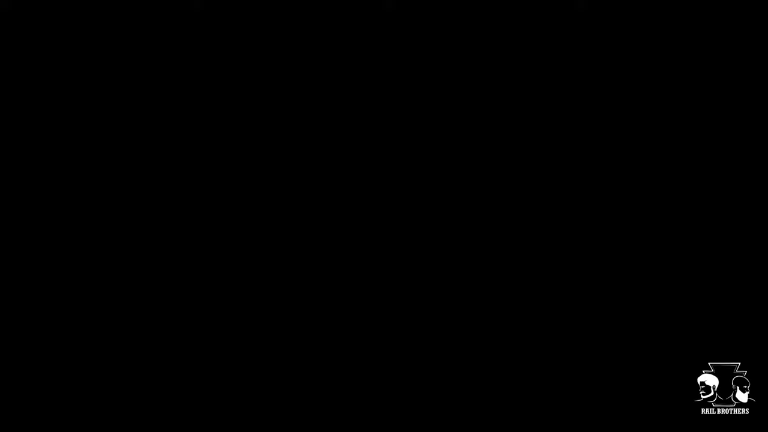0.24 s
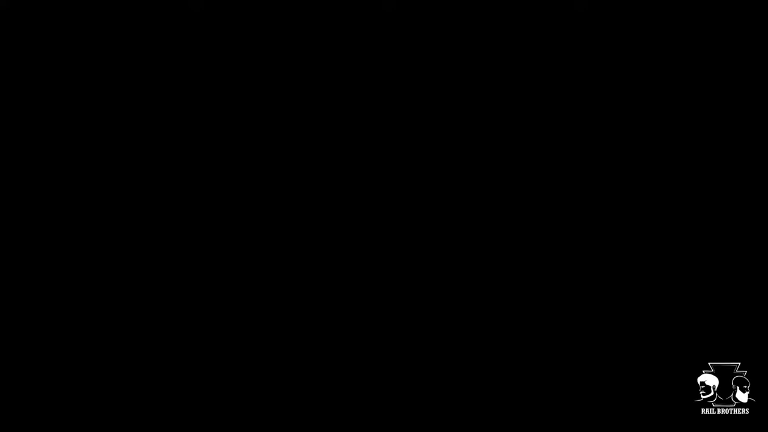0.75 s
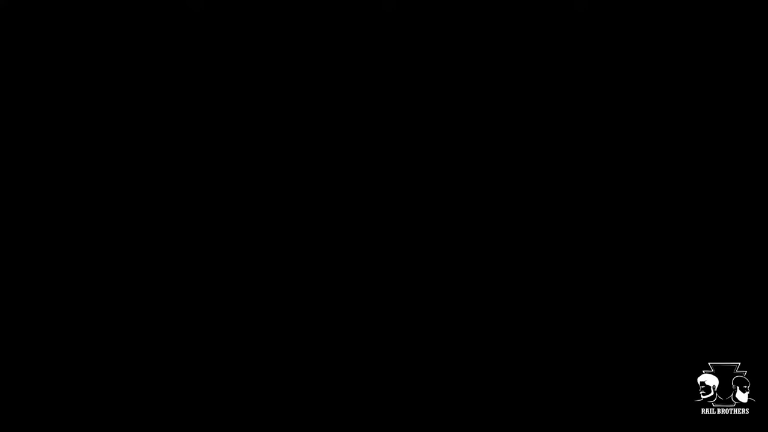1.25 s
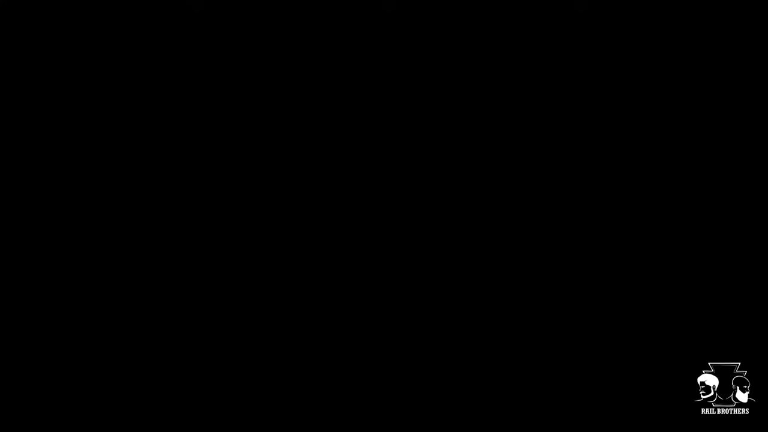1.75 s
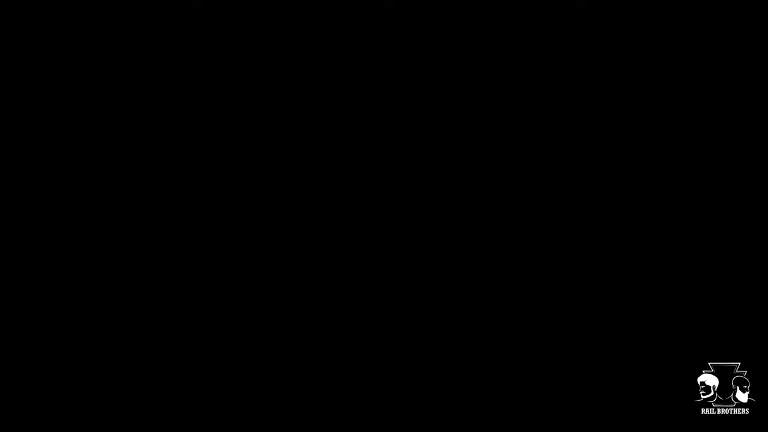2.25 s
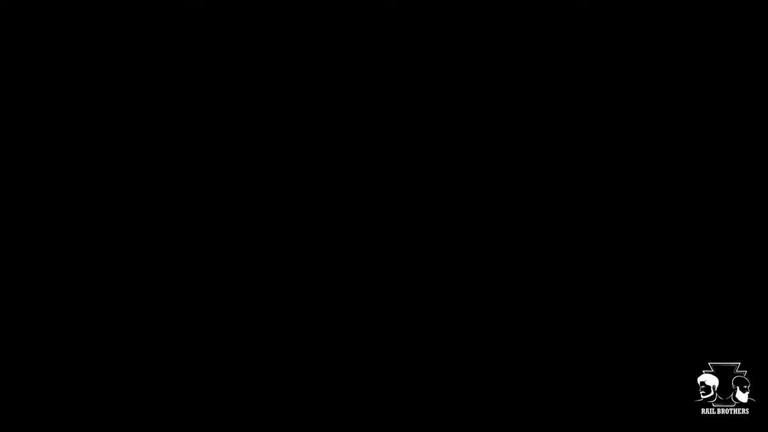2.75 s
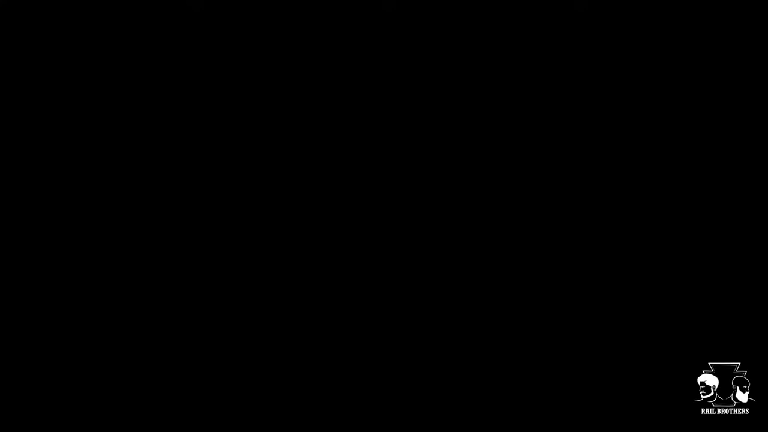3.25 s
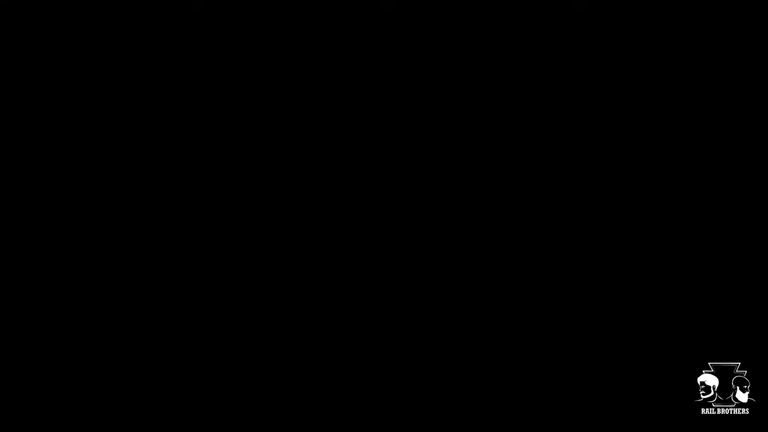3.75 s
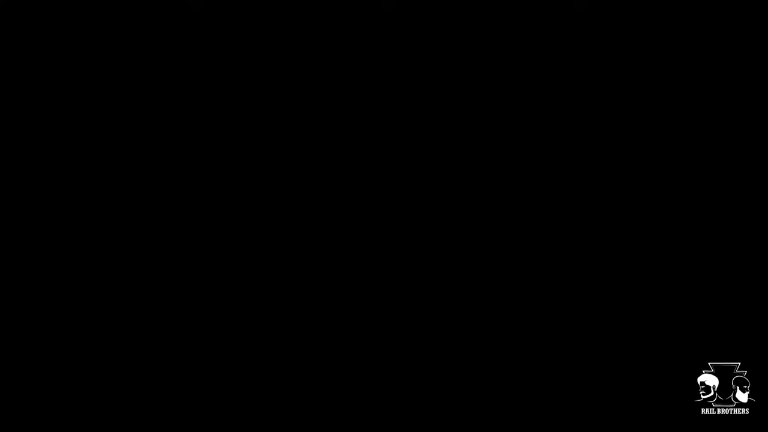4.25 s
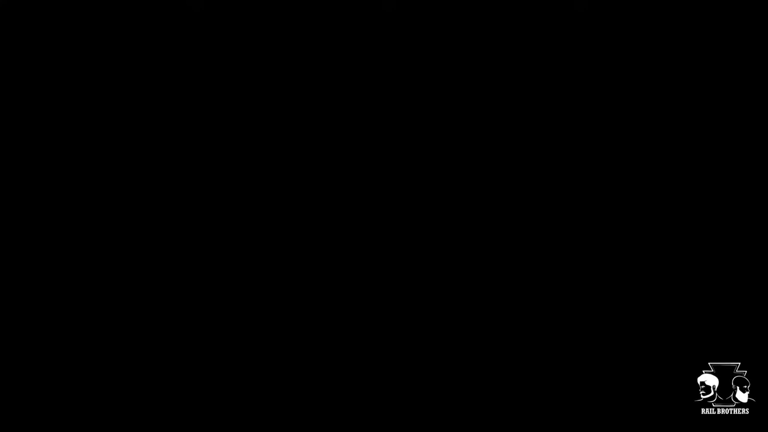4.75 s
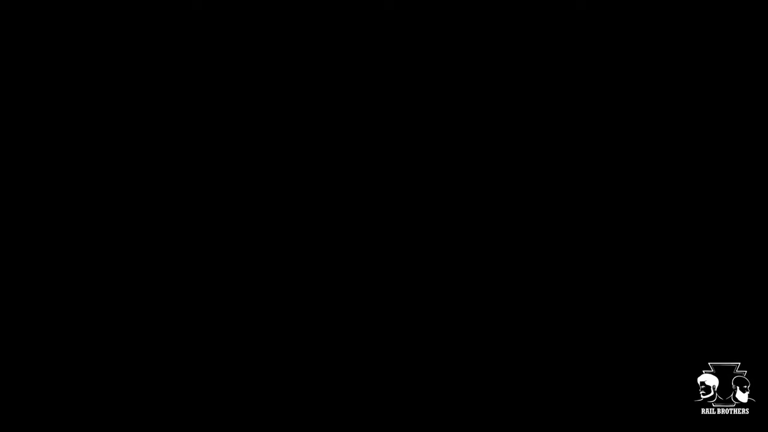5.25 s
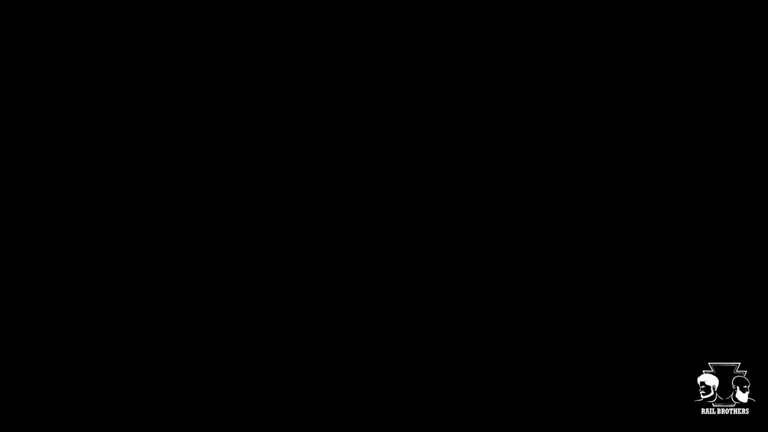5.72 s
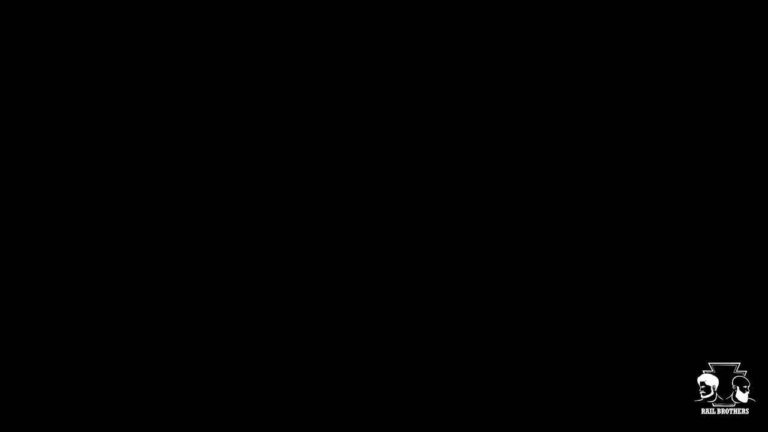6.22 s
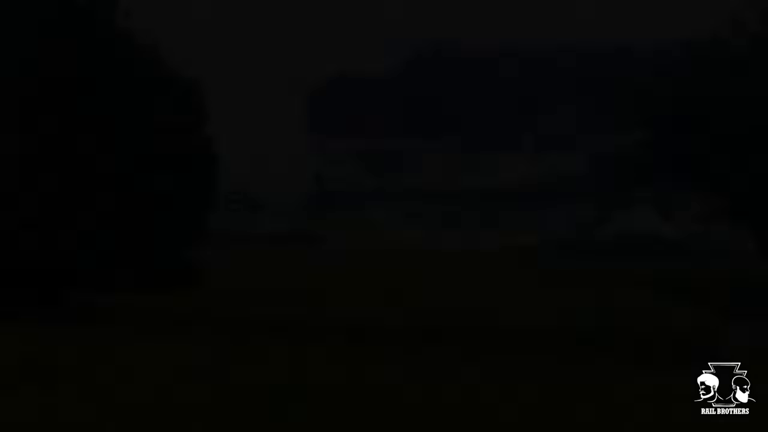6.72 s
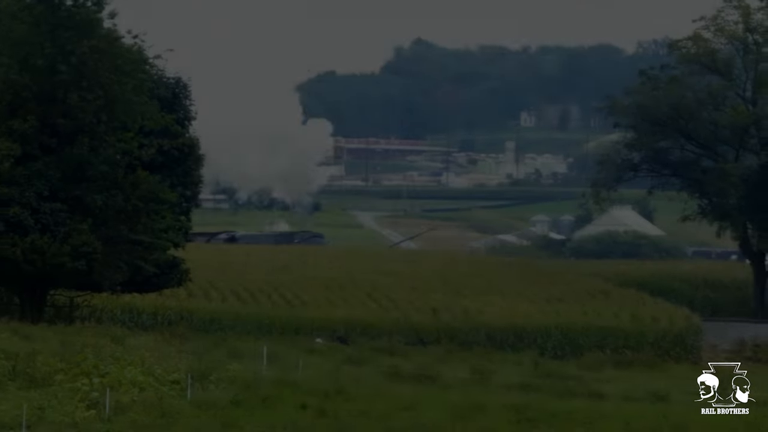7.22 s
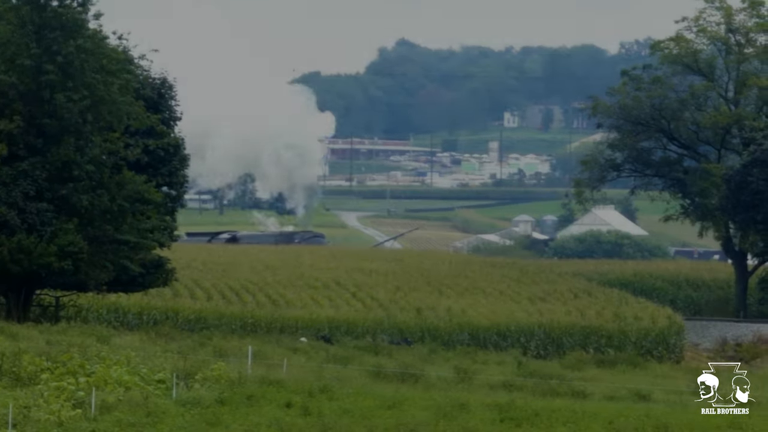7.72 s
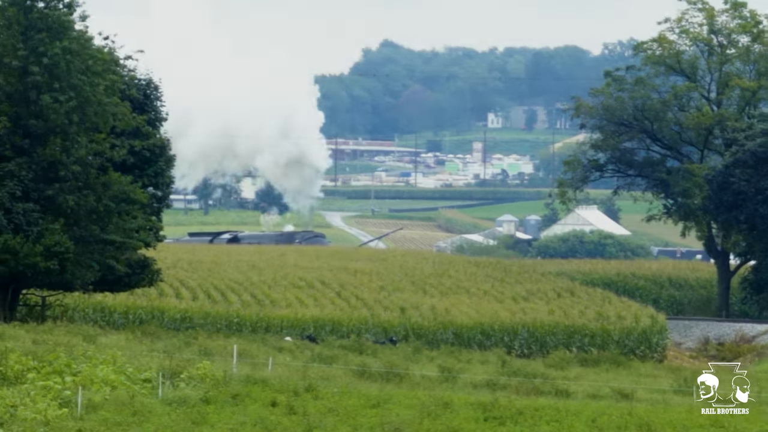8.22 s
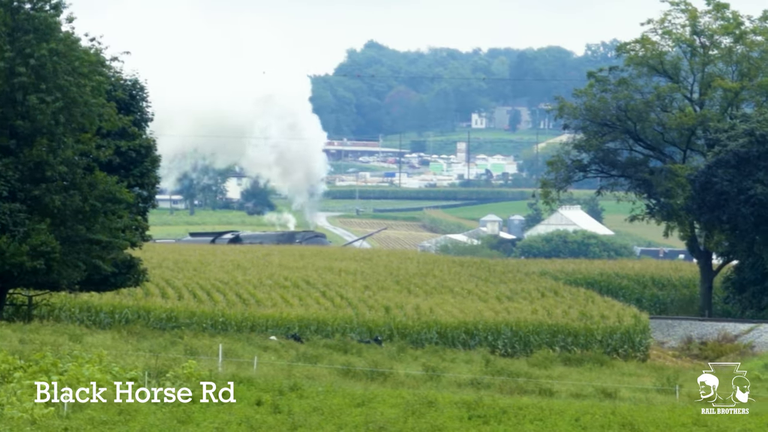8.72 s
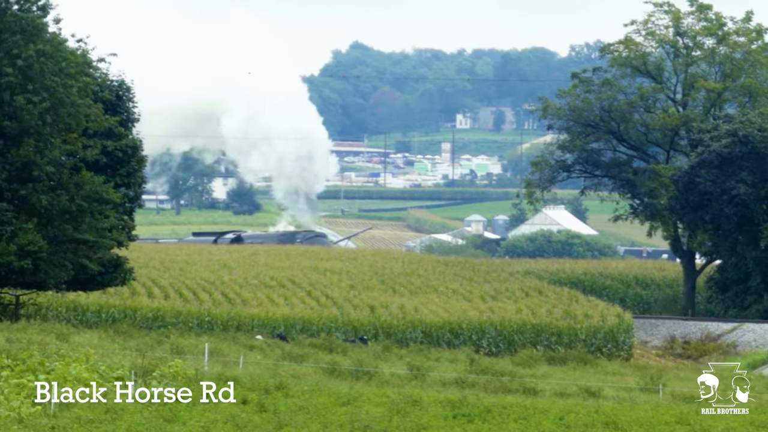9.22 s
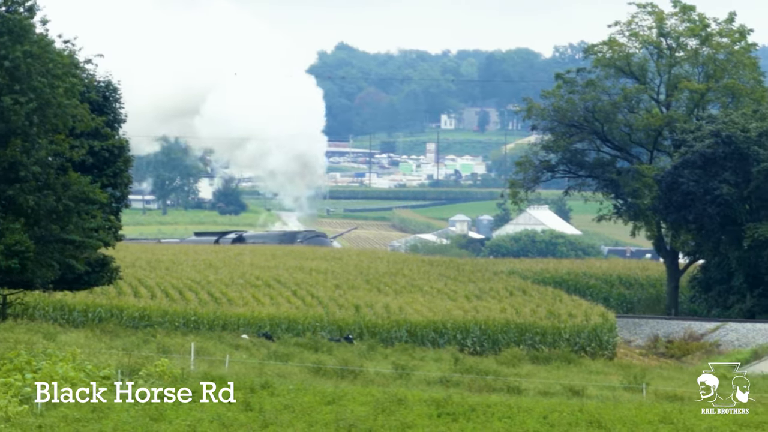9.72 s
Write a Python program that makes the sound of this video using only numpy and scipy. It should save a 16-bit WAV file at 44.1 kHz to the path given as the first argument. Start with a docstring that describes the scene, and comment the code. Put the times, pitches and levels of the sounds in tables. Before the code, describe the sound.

From near silence, a summer meadow fades in over about 2.5 seconds. Low wind gusts rumble on the microphone, most noticeably around 2.2 and 3.2 s, then ease. Shrill crickets trill continuously around 7 kHz, somewhat stronger on the right, with rough short chirps from a nearer one and a very fine high sizzle above. A faint whistle slides downward at 2.3 s. Far off, a steam locomotive works over a low, wavering drone: soft, hollow puffs about five a second, slightly uneven in fours, each followed by a dull thump. The puffs emerge after 2 s and grow clearer, strongest near 6.6 and 9 s. Heavier low booms fall at 5.9 and 8.3 s. At 6.6 s a quick grainy rustle brushes close by for about a quarter second; around 7 s a lone cricket's soft regular pips swell and sink. Train and insects continue to the end at 10 s.

```python
"""A steam locomotive works far off across summer fields, about five exhaust beats a second.
The sound fades in over some two and a half seconds, while a breeze rumbles on the microphone.
Throughout, shaped noise makes puffs, thumps and drone; gliding tones make the crickets in the grass.
A faint falling whistle comes soon after two seconds; past six, noise bursts rustle close by,
and shortly afterwards the soft pips of a lone cricket swell once."""
import sys
import numpy as np
from scipy import signal
from scipy.fft import rfft, irfft, next_fast_len
from scipy.io import wavfile

SR = 44100
rng = np.random.default_rng(int(sys.argv[2]) if len(sys.argv) > 2 else 0)


def wrap_up_sound(samples):
    """Save the sound to the file named by the first command line argument, as 16-bit audio."""
    columns = np.atleast_2d(samples).T
    # keep every value between -1 and 1, then stretch to whole-number steps
    tamed = np.clip(columns, -1, 1)
    steps = np.round(tamed * 32767).astype(np.int16)
    wavfile.write(sys.argv[1], SR, steps)


N = 439677
TIME = np.arange(N) / SR
BINS = np.fft.rfftfreq(N, 1 / SR)


def amp(db):
    """Decibel law: a level in dB becomes an amplitude ratio."""
    return 10 ** (np.asarray(db) / 20)


def unit(x):
    """Normalization: the signal is scaled to an rms of one."""
    return x / np.sqrt(np.mean(x ** 2) + 1e-20)


def level(rows):
    """Level contour: gain over time from rows of (time [s], level [dB])."""
    return amp(np.interp(TIME, *np.transpose(rows)))


def over_hz(points):
    """Spectral interpolation: (frequency [Hz], value) points are joined on a log-frequency axis."""
    hz, value = np.transpose(points)
    return np.interp(np.log(BINS + 1), np.log(hz + 1), value)


def drift(per_s, count=16384):
    """Random modulation: unit normal values, per_s of them a second, joined by straight lines."""
    return np.interp(TIME * per_s, np.arange(count), rng.standard_normal(count))


# Likeness of the two channels: (frequency [Hz], correlation [-1 to 1])
CHANNEL_CORRELATION = [(60, 0.96), (130, 0.92), (290, 0.67), (640, 0.21), (1400, 0.28), (3100, 0.03),
                       (7000, -.15), (11000, 0.12), (15000, 0.47)]


def noise(colour, left_db=0, same=None):
    """Spectral shaping: stereo noise of given colour, channel correlation and lean to the left."""
    size = next_fast_len(N)
    hz = np.fft.rfftfreq(size, 1 / SR)
    first, second = rfft(rng.standard_normal((2, size)))
    if same is None:
        same = np.interp(hz, BINS, over_hz(CHANNEL_CORRELATION))
    same = np.clip(same, -1, 1)
    other = same * first + np.sqrt(1 - same ** 2) * second
    skirt = 1 / (1 + (hz / colour[-1][0]) ** 8)  # roll-off around the last colour point
    shape = np.interp(hz, BINS, amp(over_hz(colour))) * skirt
    pair = irfft(np.array([first, other]) * shape, size)[:, :N]
    return unit(pair) * amp([[left_db / 2], [-left_db / 2]])


def band(hz, width):
    """Heterodyning: slow noise modulates a carrier into one resonance of unit rms, which may move."""
    low_pass = signal.butter(2, width / 2, fs=SR, output="sos")
    slow = signal.sosfilt(low_pass, rng.standard_normal((2, N)))
    angle = 2 * np.pi * np.cumsum(hz * np.ones(N)) / SR
    return unit(slow[0] * np.cos(angle) + slow[1] * np.sin(angle))


def swell(s, half_length):
    """Gaussian envelope: a smooth hump of height one at time s, down to 1/e at half_length."""
    return np.exp(-((TIME - s) / half_length) ** 2)


def bursts(starts, levels_db, rise, decay):
    """Energy summation: bursts that swell quickly and decay exponentially add in power."""
    power = np.zeros(N)
    t = np.arange(SR // 2) / SR
    shape = (1 - np.exp(-(t / rise) ** 2)) * np.exp(-t / decay)
    for s, db in zip(starts, levels_db):
        part = power[round(s * SR):][:len(t)]  # a view, so that += adds into power
        part += (amp(db) * shape[:len(part)] / shape.max()) ** 2
    return np.sqrt(power)


def strokes(hz, fall, per_s, duty, scrape, unsteady=.015):
    """Stridulation: a wing file dragged over its scraper gives a tone that sinks through each stroke."""
    turns = np.cumsum(per_s * (1 + unsteady * drift(1.5))) / SR + rng.random()
    along = np.minimum(turns % 1 / duty, 1)  # 0 to 1 through the stroke, then silent
    pitch = hz * (1 + fall * (.5 - along) + scrape * drift(900) + .003 * drift(8))
    return np.sqrt(np.abs(np.sin(np.pi * along))) * np.sin(2 * np.pi * np.cumsum(pitch) / SR)


def grass(x, t60, direct):
    """Multiple scattering: stalks and leaves give many short decaying paths, different for each side."""
    t = np.arange(SR // 5) / SR
    paths = rng.standard_normal((2, len(t))) * amp(-60 * t / t60)
    paths /= np.linalg.norm(paths, axis=1, keepdims=True)
    paths[:, 0] += direct * np.array([1, -1])  # direct sound, of opposite sign on the two sides
    scattered = signal.oaconvolve(x[None], paths, axes=1)[:, :N]
    return np.array([unit(side) for side in scattered])


# Drone of the rolling train and the countryside: (frequency [Hz], density [dB per Hz])
DRONE_SPECTRUM = [(20, -29), (45, -14), (62, -9.5), (84, -2.5), (100, -9.5), (135, -3.5), (165, -15),
                  (200, -14), (300, -19), (520, -21), (850, -20), (2000, -23.5), (4000, -24), (9000, -36)]
# Faint hum within the drone: (frequency [Hz], width [Hz], level [dB])
HUM_BANDS = [(63.3, 6.4, -50), (97, 4.7, -54.5), (114, 6.4, -52.5), (135, 6.6, -56.5), (359.6, 9.2, -69.5)]


def drone():
    """Superposition: the roar of wheels and distance, with the wavering hum of narrow noise bands."""
    hum = sum(amp(db) * band(hz, width) for hz, width, db in HUM_BANDS)
    roar = amp(-45.5) * noise(DRONE_SPECTRUM, left_db=0.5)
    return roar * amp(.5 * drift(2.97)) + hum


# Wind on the microphone: (frequency [Hz], density [dB per Hz])
WIND_SPECTRUM = [(10, -23), (22, -6), (35, 1.5), (60, 0), (100, -3.5), (170, -16.5), (300, -42), (800, -67)]
# The breeze dies down, then recovers slightly: (time [s], level [dB])
BREEZE_LEVEL = [(0, -39), (1.8, -44), (2.7, -47), (4.2, -48.5), (4.8, -50), (5.3, -50), (5.9, -47.5),
                (9.97, -47)]
# Its gusts: (time of the height [s], half length [s], level [dB])
GUST_HUMPS = [(.48, .035, -30), (0.825, 0.067, -31), (1.123, 0.041, -35), (1.96, .07, -36),
              (2.208, 0.028, -29), (3.184, 0.039, -28.5), (3.365, 0.22, -36.5), (3.9, 0.11, -38)]


def breeze():
    """Wind buffeting: lumpy low noise, alike on both sides, to which gusts add in power."""
    power = level(BREEZE_LEVEL) ** 2
    for s, half_length, db in GUST_HUMPS:
        power += (amp(db) * swell(s, half_length)) ** 2
    return noise(WIND_SPECTRUM, left_db=2.5, same=0.86) * np.sqrt(power) * amp(2.6 * drift(11))


def far_bird(s=2.27, half_length=.05, hz=2550, sink_hz_per_s=3800, db=-56):
    """Frequency modulation: one faint whistle slides downwards."""
    pitch = hz - sink_hz_per_s * np.clip(TIME - s, -2 * half_length, 2 * half_length)
    return amp(db) * swell(s, half_length) * np.sin(2 * np.pi * np.cumsum(pitch) / SR)


SIZZLE_DB = -52.5
# The high sizzle of katydids: (frequency [Hz], density [dB per Hz])
SIZZLE_SPECTRUM = [(6000, -48), (8800, -8.5), (10000, -4.5), (12000, -1), (14000, 2), (15700, 0),
                   (17000, -20)]
# Thin whines in it: (time of the height [s], half length [s], pitch [Hz], glide [Hz per s], level [dB])
GLIDING_WHINES = [(1.3, .4, 14200, 300, -60), (2.3, .45, 15000, 1000, -60), (5.15, .35, 15200, 1500, -62),
                  (6.2, .5, 14200, 1501.5, -57.5), (9.9, .4, 14200, -600, -54)]


def katydids():
    """Band-limited noise: a fine, even sizzle above the crickets, with gliding resonances in it."""
    out = noise(SIZZLE_SPECTRUM, left_db=1.2) * amp(SIZZLE_DB + 1.2 * drift(55))
    for s, half_length, hz, glide, db in GLIDING_WHINES:
        pitch = hz + glide * np.clip(TIME - s, -half_length, half_length)
        sides = np.array([band(pitch, 800), band(pitch, 800)])  # independent left and right
        out += sides * amp(db) * swell(s, half_length)
    return out


# Farther chirping crickets: (wing pitch [Hz], fall [share of pitch], strokes [per s], chirps [per s],
# time near one chirp [s], left level [dB], right level [dB])
FAR_CHIRPERS = [(4720, 0.049, 19.4, 2.5, 0.33, -65, -61.5), (4370, 0.05, 18, 2.6, 0.12, -59, -57.5),
                (4080, 0.17, 16.5, 2.38, 0.26, -68, -57.5)]
# They slowly grow quieter: extra level at the start [dB], loss [dB per s]
EAGER_DB, TIRE_DB_PER_S = 3, .5


def chirping_crickets():
    """Amplitude modulation: farther voices pulse, each at its own wandering pace of chirps."""
    out = np.zeros((2, N))
    for hz, fall, per_s, chirps_per_s, s, left_db, right_db in FAR_CHIRPERS:
        turns = chirps_per_s * (TIME - s) + 0.21 * drift(1.42)
        chirp = np.clip(0.2 + 0.85 * np.cos(2 * np.pi * turns), 0, 1)
        wing = strokes(hz, fall, per_s, duty=.7, scrape=.015, unsteady=.05)
        out += grass(wing * chirp, t60=0.05, direct=1.0) * amp([[left_db], [right_db]])
    return out * amp(EAGER_DB - TIRE_DB_PER_S * TIME + 1.2 * drift(0.76))


# Soft pips swell once: resting level [dB], swell [dB], its middle [s], its half length [s]
PIP_DB, PIP_SWELL_DB, PIP_SWELL_AT_S, PIP_SWELL_S = -61, 12, 7.03, 0.76


def lone_cricket():
    """Periodic pulses: regular short pips, stronger on the right, each a little arch of pitch."""
    pip_at_s, pips_per_s, top_hz = 6.803, 4.33, 5560
    from_pip = ((TIME - pip_at_s) * pips_per_s + .5) % 1 - .5  # in pip periods
    pitch = top_hz * (1 - 4 * np.minimum(from_pip ** 2, .02) + .008 * drift(900))
    wing = np.exp(-(from_pip / .06) ** 2) * np.sin(2 * np.pi * np.cumsum(pitch) / SR)
    loudness = amp(PIP_DB + PIP_SWELL_DB * swell(PIP_SWELL_AT_S, PIP_SWELL_S))
    return grass(wing, t60=0.045, direct=1.2) * loudness * amp([[-8], [0]])


# The blur of many far crickets: (frequency [Hz], density [dB per Hz])
CHORUS_SPECTRUM = [(3000, -44.5), (4100, -28), (4490, -22), (4950, -29.5), (5500, -22.5), (6000, -20.5),
                   (6400, -8.5), (6750, -4.5), (7110, 2), (7280, -6), (7420, -3), (7750, -19), (8200, -23),
                   (8900, -67)]
# Near trills: (wing pitch [Hz], strokes [per s], left and right level within the chorus [dB, dB])
NEAR_TRILLS = [(6923, 13.8, -6, .5), (7006, 16.3, 4, 0), (6770, 15.1, -4.5, -11), (6825, 12.9, -4.5, -9.5),
               (7392, 14.2, -0.5, -14.5)]
# Gain of the whole chorus: (time [s], level [dB], lean to the left [dB])
CHORUS_GAIN = [(2.5, -36.5, -4.5), (3.6, -34.5, -3.5), (4.6, -33, -2), (5.2, -36, -4), (6, -36.5, -6),
               (7.4, -37, -6.5), (8.8, -37, -9.5), (9.97, -37.5, -7)]


def trilling_crickets():
    """Incoherent summation: far trills merge into noise, from which a few near ones stand out."""
    chorus = amp(4.0) * noise(CHORUS_SPECTRUM) * amp(1.3 * np.array([drift(40), drift(40)]))
    for hz, per_s, left_db, right_db in NEAR_TRILLS:
        wing = strokes(hz, .06, per_s, duty=.58, scrape=.023, unsteady=.012)
        trill = wing * amp(1.5 * drift(15))
        chorus += grass(trill, t60=0.044, direct=0.72) * amp([[left_db], [right_db]])
    s, db, lean_db = np.transpose(CHORUS_GAIN)
    return chorus * amp([np.interp(TIME, s, db + side * lean_db / 2) for side in (1, -1)])


# Clearest chirps of the nearest cricket: (time [s], strokes, pitch [Hz], level before side gains [dB])
NEAREST_CHIRPS = [(.42, 4, 4500, -47), (1.32, 5, 4580, -49), (1.77, 5, 4560, -44), (2.13, 3, 4640, -50),
                  (2.411, 3, 4530, -47.5), (2.78, 6, 4530, -49.5), (3.55, 3, 4480, -49),
                  (4.138, 4, 4490, -47), (4.721, 4, 4480, -49.5), (5.25, 4, 4560, -48),
                  (5.849, 3, 4470, -52), (6.9, 3, 4490, -50.5), (7.52, 3, 4470, -54), (8.65, 3, 4500, -51),
                  (9.38, 4, 4510, -49), (9.889, 2, 4430, -48)]


def nearest_cricket(fall=0.051, per_s=18):
    """Stridulation: chirps of a few rough wing strokes, each sinking in pitch."""
    out = np.zeros(N)
    scrape = .013 * drift(900)
    for s, count, hz, db in NEAREST_CHIRPS:
        span = (TIME >= s) & (TIME < s + round(count) / per_s)
        along = np.minimum((TIME[span] - s) * per_s % 1 / .75, 1)
        pitch = hz * (1 + fall * (.5 - along) + scrape[span])
        out[span] += amp(db) * np.sin(np.pi * along) * np.sin(2 * np.pi * np.cumsum(pitch) / SR)
    # grass() normalizes, so the level is restored before the side gains
    return grass(out, t60=0.039, direct=0.91) * np.std(out) * amp([[1.5], [7.5]])


# The body of the rustle: (frequency [Hz], density [dB per Hz])
RUSTLE_BODY_SPECTRUM = [(150, -14), (350, -4), (550, -4.5), (760, 4), (1020, 2.5), (1700, -5.5),
                        (2700, -6.5), (5000, -22), (11000, -30)]
# The treble of the rustle: (frequency [Hz], density [dB per Hz])
RUSTLE_TREBLE_SPECTRUM = [(2000, -20), (5000, 0), (11000, -2.5), (16000, -6)]
# Its brushes: (time [s], body level [dB], treble level [dB])
RUSTLE_BRUSHES = [(6.58, -44.5, -48), (6.652, -43, -43), (6.72, -46, -54), (6.777, -45, -68)]


def rustle():
    """Transient friction noise: a few quick, grainy brushes, bright at first and dull at the end."""
    s, body_db, treble_db = np.transpose(RUSTLE_BRUSHES)
    body = noise(RUSTLE_BODY_SPECTRUM, left_db=1.0) * bursts(s, body_db, rise=0.02, decay=0.067)
    treble = noise(RUSTLE_TREBLE_SPECTRUM, left_db=4.5) * bursts(s, treble_db, rise=.018, decay=0.056)
    return body * amp(3.5 * drift(120)) + treble


# The wheels gain a little speed: first beat [s], gap between beats [s], its shortening per beat [s]
FIRST_BEAT_S, BEAT_GAP_S, QUICKEN_S = .201, .18976, .0000587
# Chance differences from beat to beat [dB]
PUFF_SPREAD_DB, THUMP_SPREAD_DB = 0.84, 0.84
# The four unequal beats of one wheel turn: (puff accent [dB], thump level [dB])
WHEEL_TURN_BEATS = [(-0.4, -45), (-0.5, -42), (1.55, -41.5), (1.2, -40)]
# Level of the puffs as the engine comes nearer: (time [s], level [dB])
APPROACH_LEVEL = [(1.9, -57.5), (3.3, -53.5), (5.1, -51.3), (5.8, -53.5), (6.6, -49), (8, -51.5),
                  (9.05, -48), (9.35, -49.3), (9.97, -50)]


def exhaust_beats(count=52):
    """Valve periodicity: time, puff level and thump level of each beat, four to a turn of the wheels."""
    k = np.arange(count)
    starts = FIRST_BEAT_S + BEAT_GAP_S * k - QUICKEN_S * k ** 2 / 2
    accent_db, thump_db = np.array(WHEEL_TURN_BEATS)[k % len(WHEEL_TURN_BEATS)].T
    puff_luck, thump_luck = rng.standard_normal((count, 2)).T
    puff_db = np.interp(starts, *np.transpose(APPROACH_LEVEL)) + accent_db + PUFF_SPREAD_DB * puff_luck
    return starts, puff_db, thump_db + THUMP_SPREAD_DB * thump_luck


THUMP_LAG_S = 0.024  # delay of the thump behind its puff
# The steam puff: (frequency [Hz], density [dB per Hz])
PUFF_SPECTRUM = [(300, -13), (580, -7), (760, 2), (1080, -4.5), (1500, -2.5), (1750, 0), (2600, -3.5),
                 (3600, -5.5), (6000, -35)]
# The rings of the stack: (frequency [Hz], width [Hz], level relative to the steam noise [dB])
STACK_RINGS = [(887, 140, -10), (1353, 265, -5), (2079, 280, -11.5)]
# The thump of the stack: (frequency [Hz], density [dB per Hz])
THUMP_SPECTRUM = [(35, -38), (62, -12), (85, -6.5), (113, 2.5), (135, 1.5), (160, -37), (240, -30),
                  (500, -55)]
# A few much heavier booms: (time [s], level [dB])
HEAVY_BOOMS = [(1.177, -34.5), (5.892, -35.5), (8.336, -31.5)]


def locomotive():
    """Resonance: pulsed steam noise rings the stack, each puff with a low thump just behind it."""
    starts, puff_db, thump_db = exhaust_beats()
    steam = noise(PUFF_SPECTRUM, left_db=-4.0, same=0.7)
    for hz, width, db in STACK_RINGS:
        # restless air colours every puff differently
        steam += amp(db) * band(hz, width) * amp(1.8 * drift(8))
    puffs = steam * bursts(starts, puff_db, rise=0.043, decay=0.073) * amp(0.79 * drift(110))
    boom_s, boom_db = np.transpose(HEAVY_BOOMS)
    push_s = np.r_[starts + THUMP_LAG_S, boom_s]
    push = bursts(push_s, np.r_[thump_db, boom_db], rise=0.029, decay=0.075)
    return puffs + noise(THUMP_SPECTRUM, left_db=2.0) * push


def scene():
    """Linear superposition: the train far off, the meadow close by."""
    insects = katydids() + chirping_crickets() + lone_cricket() + trilling_crickets() + nearest_cricket()
    return drone() + breeze() + far_bird() + insects + rustle() + locomotive()


# The fade-in is a power of time: start [s], end [s], power; then the overall gain [dB]
FADE_FROM_S, FADE_TO_S, FADE_POWER, GAIN_DB = -0.34, 2.636, 2.784, -3
EDGE_HZ = 15730  # upper band limit


def record(dry):
    """Gain and low-pass filtering: the fade-in, then the band limit."""
    fade = np.clip((TIME - FADE_FROM_S) / (FADE_TO_S - FADE_FROM_S), 0, 1) ** FADE_POWER
    low_pass = signal.firwin(1023, EDGE_HZ, window=("kaiser", 9), fs=SR)
    return signal.oaconvolve(dry * fade * amp(GAIN_DB), low_pass[None], "same")


dry = scene()
out = record(dry)
wrap_up_sound(out)
```